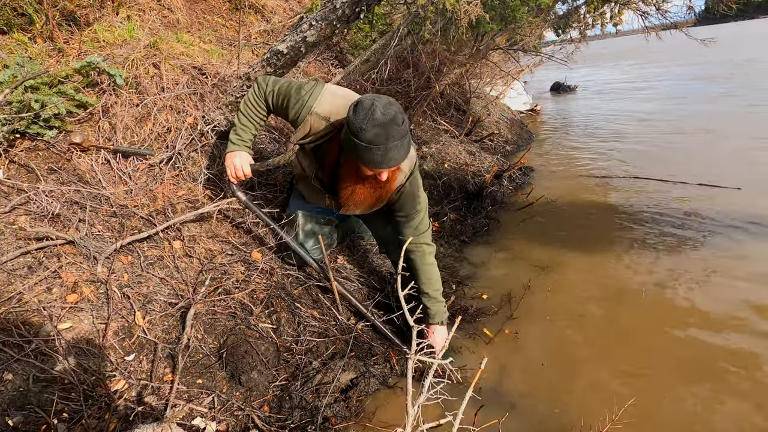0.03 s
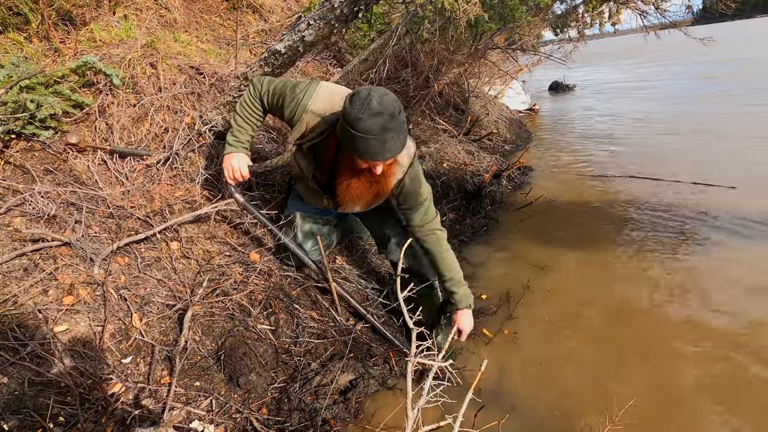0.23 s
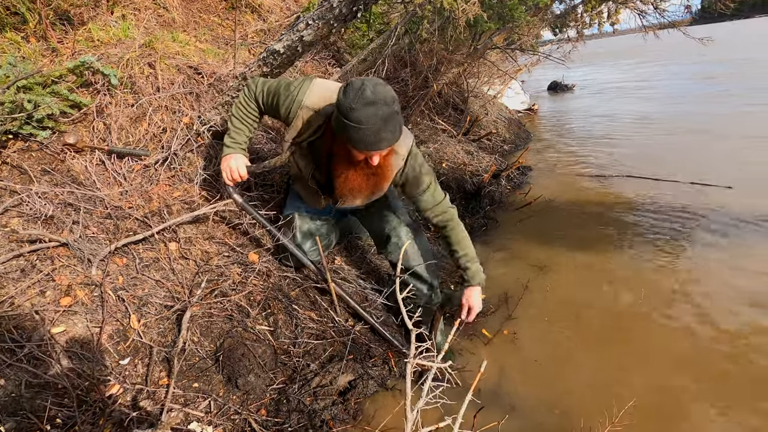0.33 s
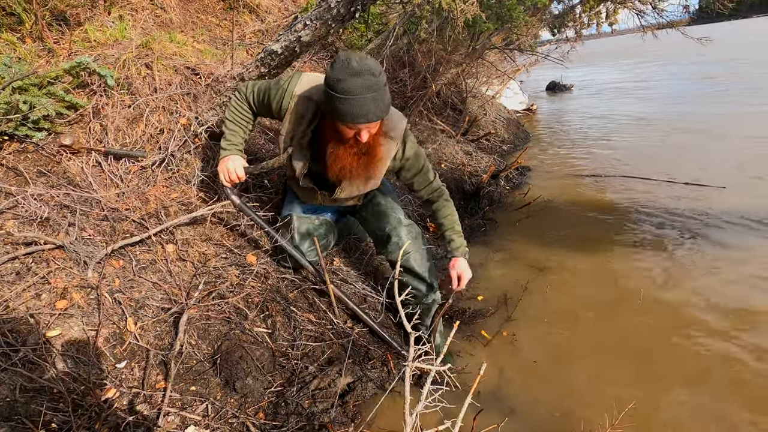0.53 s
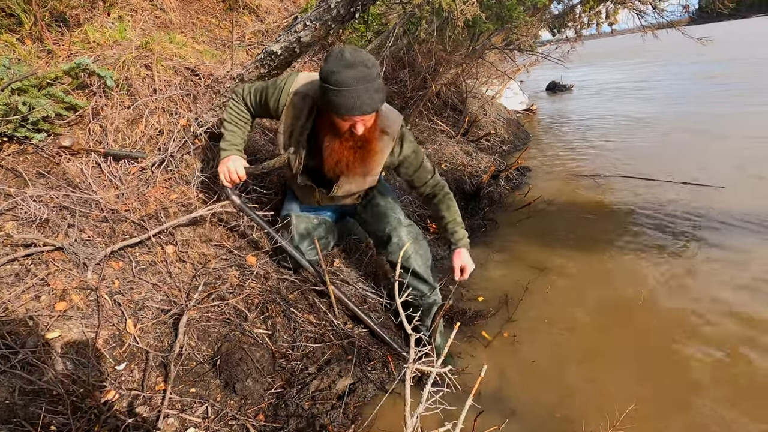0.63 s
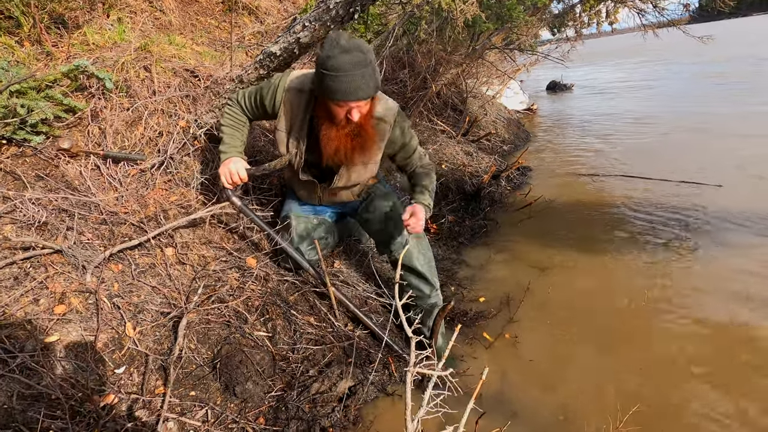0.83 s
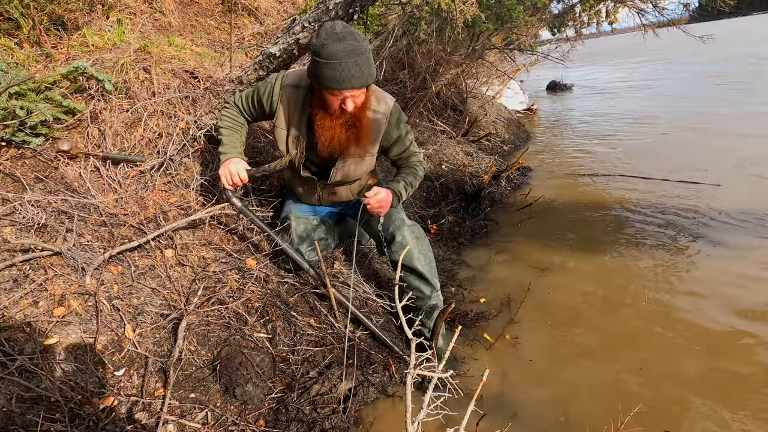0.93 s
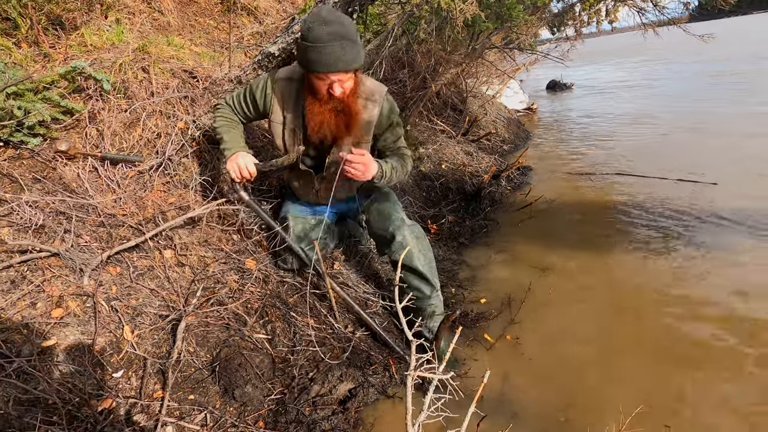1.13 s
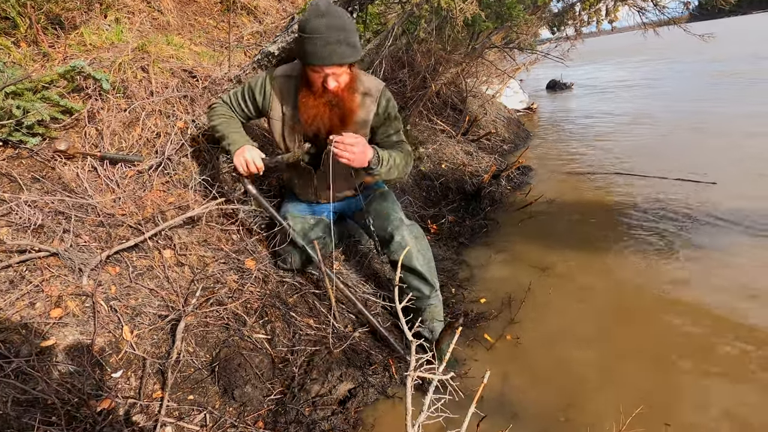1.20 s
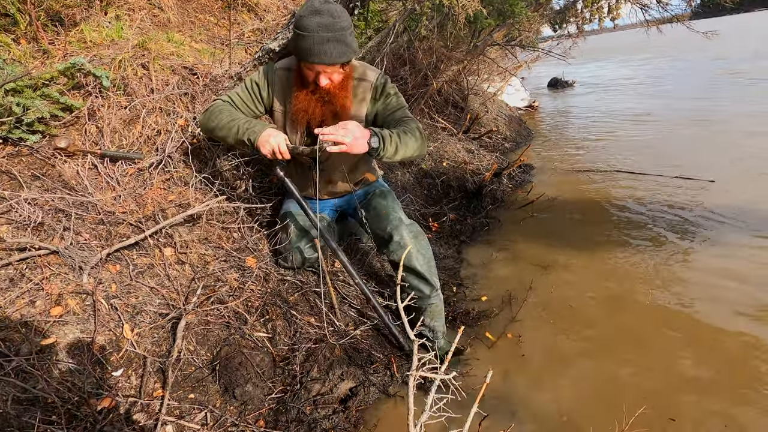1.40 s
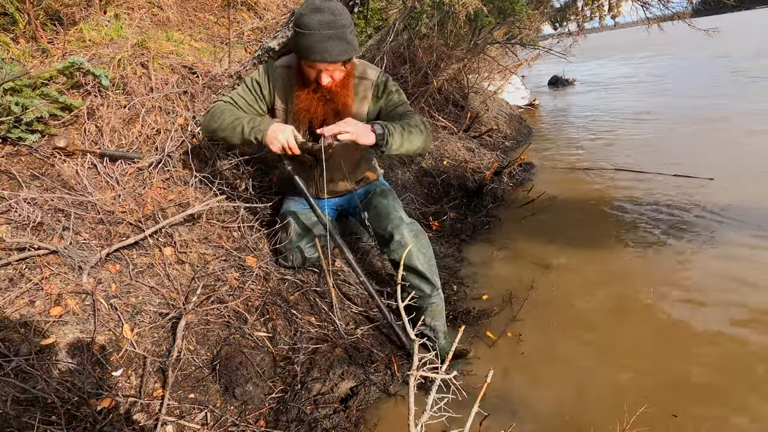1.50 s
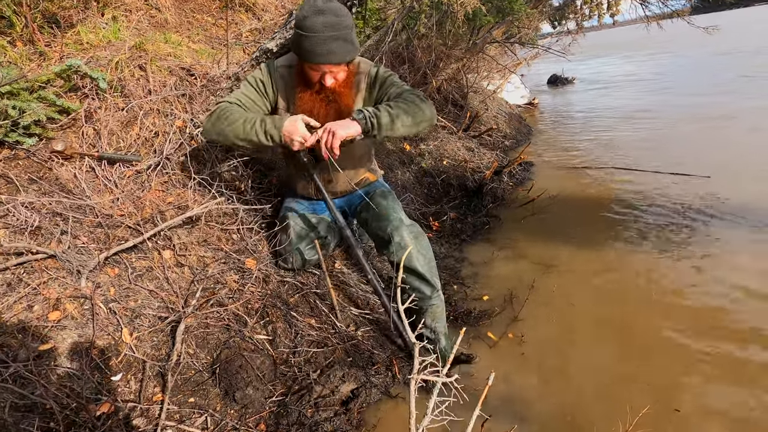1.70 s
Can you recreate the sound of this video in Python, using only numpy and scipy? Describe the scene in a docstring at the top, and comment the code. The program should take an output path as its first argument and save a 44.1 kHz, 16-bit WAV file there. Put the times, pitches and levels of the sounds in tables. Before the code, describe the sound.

A steel trap clinks close by, slightly to the right. Its wire scrapes and pings from about 0.2 seconds, then sharp clinks come between 0.45 and 0.6 seconds, the last ringing longest. Boots and knees bump softly in mud until about 0.8 seconds. Small clicks and scuffs follow, with a faint metal ring at 1.7 seconds. Clothes rustle throughout, over faint river hiss and light wind rumble.

```python
"""A muddy riverbank, a stereo microphone close to a steel trap being lifted on its wire, slightly right.
The river hisses faintly behind and a little wind rumbles on the microphone. Clothes rustle, boots and
knees bump the mud, and small parts click in the hands. The wire scrapes and pings, and the trap clinks
sharply, its steel ringing longest as it swings free."""
import sys
import numpy as np
from scipy import signal
from scipy.fft import rfft, irfft
from scipy.io import wavfile

SR = 44100
rng = np.random.default_rng(int(sys.argv[2]) if len(sys.argv) > 2 else 0)


def int16_out(signal):
    """Quantize to a 16-bit WAV file."""
    q = np.round(np.clip(np.atleast_2d(signal).T, -1, 1) * 32767)
    wavfile.write(sys.argv[1], SR, q.astype(np.int16))


N = 77175
T = np.arange(N) / SR
HZ = np.maximum(np.fft.rfftfreq(2 * N, 1 / SR), 1)


def from_db(db):
    """Decibels to gain."""
    return 10 ** (np.asarray(db) / 20)


def unit_rms(x):
    """Scale to unit rms."""
    return x / np.sqrt(np.mean(x ** 2) + 1e-20)


def level(curve):
    """Gain over time from (time [s], level [dB]) points."""
    return from_db(np.interp(T, *np.transpose(curve)))


def response(points):
    """Gain over frequency from (frequency [Hz], level [dB]) points."""
    hz, db = np.transpose(points)
    return from_db(np.interp(np.log(HZ), np.log(hz), db))


def shaped(x, gains):
    """Filter by a gain for each frequency."""
    return irfft(rfft(x, 2 * N) * gains)[..., :N]


def blow(start, attack, t60):
    """Envelope with a short rise and an exponential decay."""
    age = np.maximum(T - start, 0)
    return np.minimum(age / attack, 1) * np.exp(np.maximum(-np.log(1000) * age / t60, -25))


def ring(start, hz, attack, t60):
    """One decaying mode."""
    return blow(start, attack, t60) * np.sin(2 * np.pi * (hz * (T - start) + rng.random()))


def grains(per_s, spread_db):
    """Random tiny slips of uneven size."""
    sizes = from_db(spread_db * np.minimum(rng.exponential(1, N), 4)) * rng.choice([-1, 1], N)
    return sizes * (rng.random(N) < per_s / SR)


# stereo width at the microphone: (frequency [Hz], side minus mid [dB])
STEREO_WIDTH = [(300, -12), (2800, -5.5), (4500, -4.5), (10000, -1)]
def noise(colour):
    """Coloured noise of unit rms, less alike on the two sides towards the treble."""
    mid, side = rng.standard_normal((2, N))
    pair = mid + shaped(side, response(STEREO_WIDTH)) * [[1], [-1]]
    return unit_rms(shaped(pair, response(colour)))


# hiss of the water: (frequency [Hz], level [dB])
RIVER_COLOUR = [(100, -29), (600, -44), (1600, 0.5), (3000, -7), (16000, -25.5)]
def river():
    """The river is a faint, steady hiss in the distance."""
    return from_db(-67) * noise(RIVER_COLOUR)


# rumble on the microphone: (frequency [Hz], level [dB]), and its overall level
WIND_COLOUR, WIND_DB = [(30, 52), (60, -49), (600, -59)], -74
def wind():
    """Light wind reaches the left side of the microphone more."""
    gusts = unit_rms(shaped(rng.standard_normal((2, N)), response(WIND_COLOUR)))
    return from_db(WIND_DB) * (gusts[0] + gusts * [[1], [-.5]])


# rustle of clothes, then low ruffle of heavy cloth: (time [s], level [dB])
RUSTLE_LEVEL = [(0, -47.5), (.05, -46), (.17, -52), (.3, -45), (.39, -52), (.56, -52), (.68, -46.5),
                (.73, -58), (.79, -54.5), (.865, -43.5), (.93, -52.5), (.958, -55.5), (.973, -44.5),
                (.995, -58.5), (1.09, -60), (1.19, -52.5), (1.37, -54.5), (1.45, -52), (1.75, -50.5)]
RUFFLE_LEVEL = [(0, -57), (.26, -57), (.36, -49), (.5, -49.5), (.68, -53), (.76, -59), (.85, -49),
                (.96, -59), (1.07, -65.5), (1.19, -59), (1.75, -61.5)]
# their spectra: (frequency [Hz], level [dB])
RUSTLE_SPECTRUM = [(100, -5), (400, 0), (750, -5), (1200, 4), (2000, 1.5), (3300, 2.5), (5000, -5),
                   (8000, -11), (11000, -20), (16000, -35)]
RUFFLE_SPECTRUM = [(100, -98), (135, -1), (185, 2.5), (300, -5), (480, -20), (4000, -58)]
def clothes():
    """Nearby cloth catches and lets go as it rubs, with a fine crackle, over a low ruffle."""
    crackle_db, flutter_db, flutter_peak_hz = -3, 1.5, 44
    crackle = unit_rms(shaped(grains(per_s=2000, spread_db=1.5), response(RUSTLE_SPECTRUM)))
    flutter = unit_rms(shaped(rng.standard_normal(N), HZ * np.exp(-HZ / flutter_peak_hz)))
    rub = noise(RUSTLE_SPECTRUM) + from_db(crackle_db) * crackle
    rustle = unit_rms(rub * from_db(flutter_db * flutter))
    return level(RUSTLE_LEVEL) * rustle + level(RUFFLE_LEVEL) * noise(RUFFLE_SPECTRUM)


# bumps on the ground: (time [s], level [dB], pitch [Hz], t60 [s])
MUD_BUMPS = [(0.327, -28, 348, 0.024), (0.373, -35.5, 190, 0.23), (0.505, -35, 185.8, 0.16),
             (.630, -24.5, 257, 0.035), (0.656, -28.5, 140.6, 0.054), (0.6723, -24, 277.5, 0.06),
             (0.688, -31.5, 117, 0.051), (0.821, -24, 262, 0.034), (1.259, -44, 217, 0.11)]
# their dull puff: (frequency [Hz], level [dB])
PUFF_COLOUR = [(80, -59), (150, 11), (320, 6), (500, -12), (5000, -61)]
def bumps():
    """Boots and knees meet soft mud: a low knock with a dull puff."""
    puff, attack_s = from_db(-8) * noise(PUFF_COLOUR), 0.006
    return sum(from_db(db) * (ring(s, hz, attack_s, t60) + puff * blow(s, attack_s, t60))
               for s, db, hz, t60 in MUD_BUMPS)


# brushes against the gear: (time [s], level [dB], length [s])
GEAR_SCUFFS = [(0.287, -45, 0.013), (.684, -39.5, 0.0059), (0.803, -41, 0.0026), (0.895, -45.5, 0.0035),
               (1.125, -43.5, 0.0054), (1.158, -47.5, 0.0065), (1.4162, -45, .005), (1.536, -50, 0.01),
               (1.583, -52, 0.0082), (1.594, -47, .006), (1.662, -47.5, 0.0019)]
# their spectrum: (frequency [Hz], level [dB])
SCUFF_SPECTRUM = [(900, -4), (3500, 0), (8000, -4.5), (16000, -24.5)]
def scuffs():
    """Fingers and sleeves scuff the gear in short bright rubs that swell and fade evenly."""
    swells = sum(from_db(db) * np.exp(-(2 * (T - s) / length) ** 2) for s, db, length in GEAR_SCUFFS)
    return noise(SCUFF_SPECTRUM) * swells


# clicks close by: (time [s], level [dB], pitch [Hz], t60 [s], snap against ring [dB])
PART_CLICKS = [(0.2464, -23.5, 3013, 0.032, -4), (.549, -38.5, 725, 0.02, -16),
               (0.819, -27, 1270, 0.0047, -16), (0.834, -33, 1300, 0.015, -6), (.877, -32, 1095, 0.02, -10),
               (.964, -34, 970, 0.01, -22), (1.107, -45.5, 2206, 0.067, -21), (1.1782, -43, 2050, 0.017, 7),
               (1.246, -39.5, 3130, 0.024, -2.5), (1.3262, -37.5, 460, 0.014, -21),
               (1.3446, -23.5, 1900, 0.0051, 1.5), (1.348, -29.5, 2270, 0.0091, -1),
               (1.399, -43, 2620, 0.04, 5), (1.619, -33.5, 1680, 0.0068, -2.5)]
# their snap: (frequency [Hz], level [dB])
SNAP_COLOUR = [(400, -31), (1200, -3), (2800, 6.5), (5000, -3), (8000, -9.5), (16000, -37)]
def clicks():
    """Small parts and twigs give a broad snap and one short ring, radiating little below their pitch."""
    snap, out = noise(SNAP_COLOUR), np.zeros((2, N))
    for s, db, hz, t60, snap_db in PART_CLICKS:
        click = ring(s, hz, attack=0.00024, t60=t60)
        click = click + from_db(snap_db) * snap * blow(s, attack=0.00081, t60=t60)
        low_cut = signal.butter(2, hz / 2, "high", fs=SR, output="sos")
        out += from_db(db) * signal.sosfilt(low_cut, click)
    return out


# modes of the wire: (frequency [Hz], level [dB], t60 [s])
WIRE_RING = [(1553, -8, .18), (3325, -4, .2), (3515, -4, .06), (4157, -3, .11), (4660, -2, .08),
             (5015, -3, .2), (5435, -4, .07), (6058, -4, .08), (7550, -8, .05)]
# its sliding: (time [s], level [dB])
WIRE_SLIDE = [(.16, -90), (.205, -54), (.236, -42), (.268, -51), (.293, -42), (.338, -56), (.372, -39),
              (.402, -70), (.428, -51), (.447, -41.5), (.5, -105)]
# its pings: (time [s], level [dB], clatter [dB])
WIRE_PINGS = [(0.3546, -36.5, -28), (0.3757, -46, -30.5), (0.4079, -32, -32.5)]
# its grit and clatter: (frequency [Hz], level [dB])
GRIT_COLOUR = [(1000, -7.5), (4000, 6), (5200, 1.5), (6500, -9.5), (9000, -5.5), (16000, -28)]
def wire():
    """Gritty sliding friction and a few sharp pings excite the same modes of the wire."""
    body = sum(from_db(db) * ring(0, hz, 1 / SR, t60) for hz, db, t60 in WIRE_RING)
    body /= np.sqrt(np.sum(body ** 2))
    slips = unit_rms(grains(per_s=4000, spread_db=3.0)) * level(WIRE_SLIDE)
    grit = from_db(3.5) * shaped(slips, response(GRIT_COLOUR))
    out = signal.fftconvolve(slips, body)[:N] + grit
    clatter = noise(GRIT_COLOUR)
    for s, ping_db, clatter_db in WIRE_PINGS:
        out = out + from_db(clatter_db) * clatter * blow(s, attack=0.0018, t60=0.056)
        for hz, db, t60 in WIRE_RING:
            out += from_db(ping_db + db) * ring(s, hz, 1 / SR, t60)
    return out


CONTACT_S = 0.0029  # rise of the trap's ring
# modes of the lightly touched trap: (frequency [Hz], level [dB])
TOUCH_RING = [(2859, -47.5), (3795, -50), (4328, -49.5), (5545, -57), (6024, -56.5)]
def touch():
    """A light touch leaves the steel ringing faintly, with no clatter."""
    return sum(from_db(db) * ring(start=1.702, hz=hz, attack=CONTACT_S, t60=0.31)
               for hz, db in TOUCH_RING)


# sparkle of the steel: (frequency [Hz], level [dB])
SPARKLE_COLOUR = [(1000, -44), (4000, -1), (6000, -6.5), (9000, 6), (15000, -11)]
def overtones(count):
    """The trap's many weak upper modes: sines at random pitches, unit rms in all."""
    lines = np.zeros(len(HZ), complex)
    lines[rng.integers(0, len(HZ), count)] = np.exp(2j * np.pi * rng.random(count))
    return unit_rms(irfft(lines * response(SPARKLE_COLOUR))[:N])


# modes of the trap: (frequency [Hz], level struck on spring [dB], jaw [dB], frame [dB], free t60 [s])
TRAP_RING = [(1005, -34, -32, -62, .46), (1189, -32, -38, -34.5, .31), (1489, -27, -24, -31, .125),
             (1815, -42, -22, -32, .19), (2362, -38, -36, -46, .33), (2865, -30, -21, -29.5, .34),
             (3202, -16.5, -14, -32, .15), (3327, -27, -31, -33, .31), (2270, -34, -26, -44, .12),
             (3803, -16, -19, -41, .13), (3860, -24, -22, -31, .05), (4345, -17, -29, -34, .15),
             (4925, -23, -29, -42, .13), (5500, -36, -29, -52, .13), (6045, -27, -26, -37, .23),
             (6753, -34, -30, -54, .16), (7350, -42, -34, -48, .17), (7475, -39, -35, -46, .17),
             (8700, -29, -40, -56, .13), (9415, -38, -33, -52, .17)]
# clinks: (time [s], level [dB], spot [0 spring, 1 jaw, 2 frame], share of free t60 [0-1], clatter [dB])
TRAP_CLINKS = [(0.4511, -2.5, 0.1, 0.38, -23.5), (0.4919, -11, 1.14, 0.31, -24), (0.4973, -2, 1, 0.43, -25),
               (0.5854, 1, 1.91, 0.98, -30)]
# clatter of loose parts: (frequency [Hz], level [dB])
CLATTER_COLOUR = [(800, -37), (1100, 2), (2000, 0.5), (3800, 13), (8500, -4.5), (11000, -7.5), (16000, -34)]
def trap():
    """Close to the microphone, each clink rings the modes by where it lands, and loose parts clatter."""
    out = np.zeros((2, N))
    clatter, sparkle = noise(CLATTER_COLOUR), overtones(count=90)
    for s, db, spot, share, clatter_db in TRAP_CLINKS:
        out += from_db(clatter_db) * clatter * blow(s, attack=0.003, t60=0.068)
        sparkle_db = db - 35 - 14.3 * np.clip(spot - 1, 0, 1)  # the frame sparkles least
        out += from_db(sparkle_db) * sparkle * blow(s, CONTACT_S, t60=0.29 * share)
        for hz, *spot_db, t60 in TRAP_RING:
            mode_db = db + np.interp(spot, [0, 1, 2], spot_db)
            out += from_db(mode_db) * ring(s, hz, CONTACT_S, t60 * share)
    return signal.sosfilt(signal.butter(3, 600, "high", fs=SR, output="sos"), out)


# balance at the microphone: (frequency [Hz], left minus right [dB])
STEREO_BALANCE = [(1300, -1), (2800, 0.5), (4300, -1), (7000, -5.5), (14000, 0.5)]
def riverbank(x):
    """The direct sound comes slightly from the right; the bank scatters a short tail to each side."""
    scatter_db, left_lag_s = -9, 0.000021
    tails = rng.standard_normal((2, N)) * blow(start=0.00401, attack=0.00021, t60=0.03)
    tails /= np.sqrt(np.sum(tails ** 2, axis=1, keepdims=True))
    scatter = from_db(scatter_db) * response(STEREO_WIDTH) * rfft(tails, 2 * N)
    lean = np.sqrt(response(STEREO_BALANCE))
    direct = np.array([lean * np.exp(-2j * np.pi * HZ * left_lag_s), 1 / lean])
    return shaped(x, direct + scatter)


def scene():
    """The gear is handled close by on the bank, over river and wind."""
    nearby = trap() + touch() + wire() + clicks() + scuffs() + bumps() + clothes()
    return riverbank(nearby) + wind() + river()


def record(dry):
    """The microphone's signal is cut steeply above 15.9 kHz."""
    return signal.sosfilt(signal.ellip(12, .1, 80, 15900, fs=SR, output="sos"), dry)


dry = scene()
out = record(dry)
int16_out(out)
```